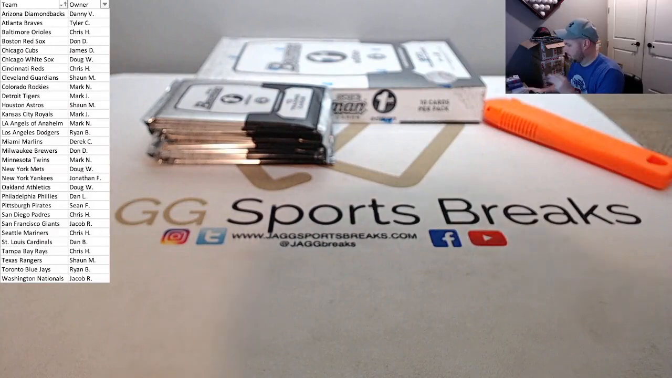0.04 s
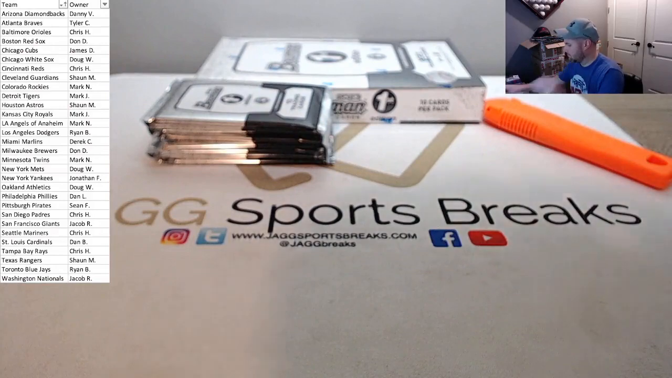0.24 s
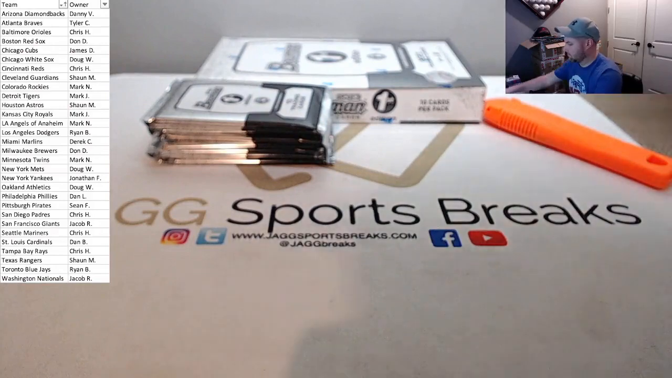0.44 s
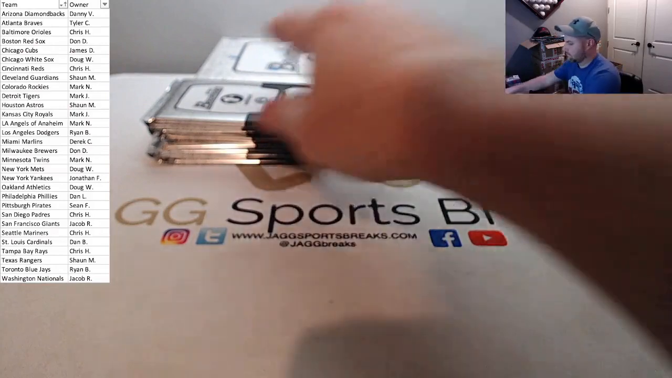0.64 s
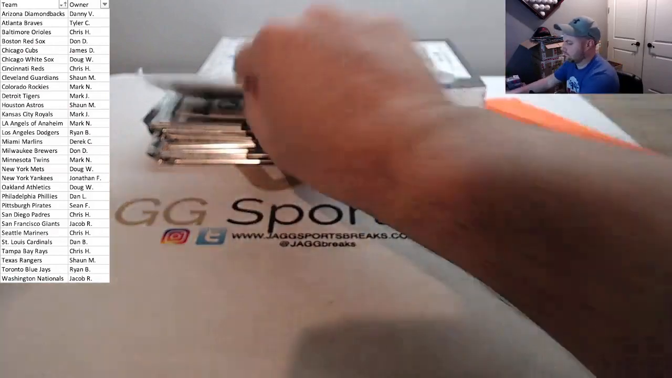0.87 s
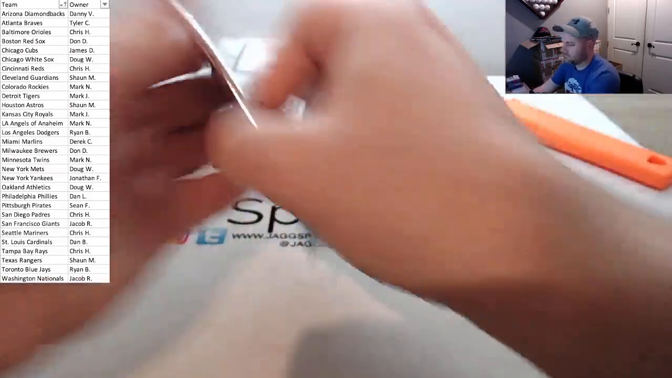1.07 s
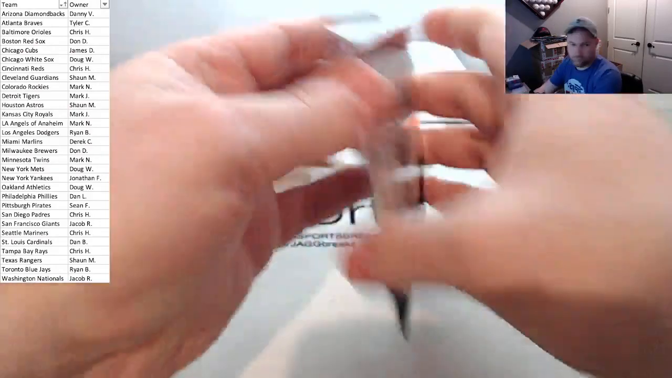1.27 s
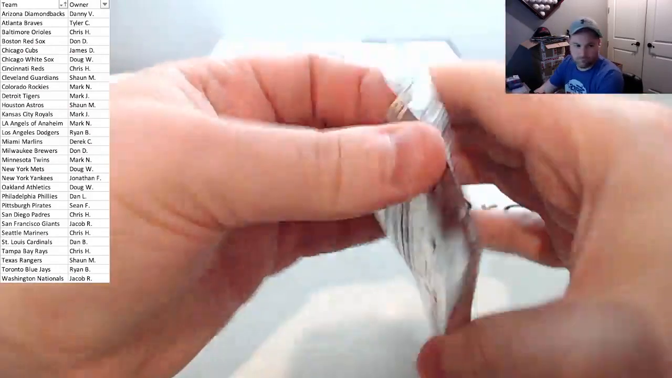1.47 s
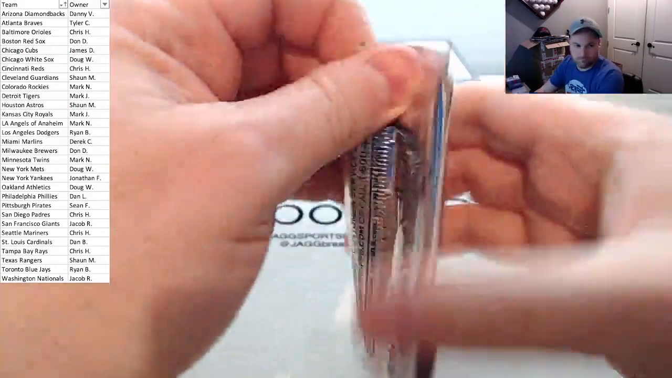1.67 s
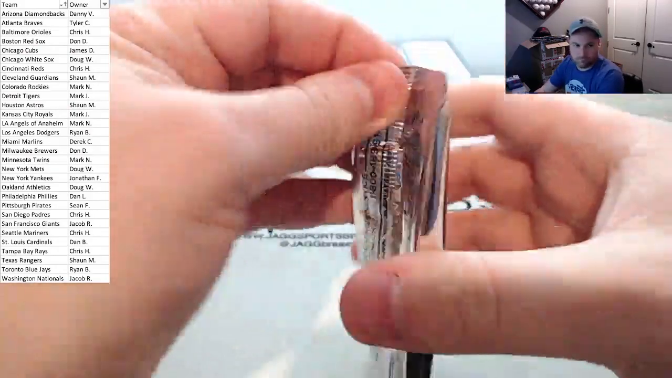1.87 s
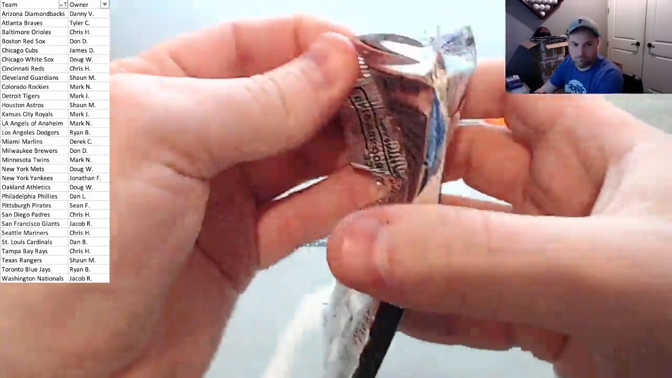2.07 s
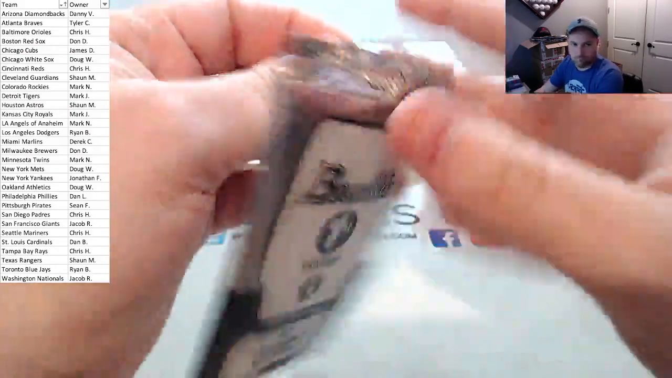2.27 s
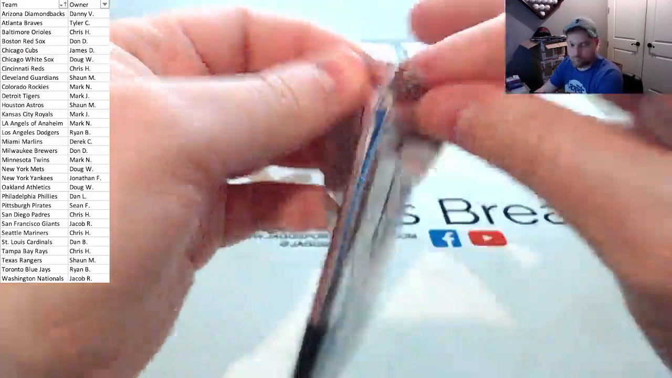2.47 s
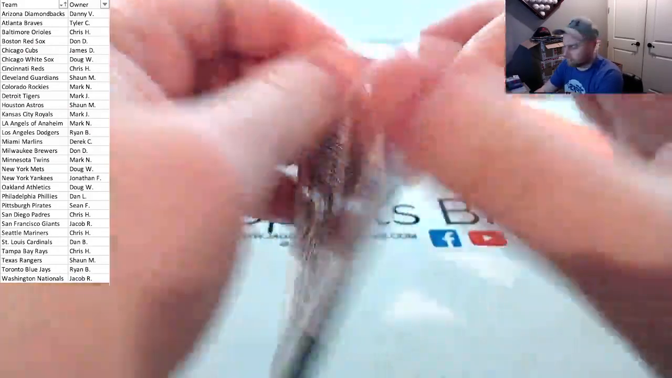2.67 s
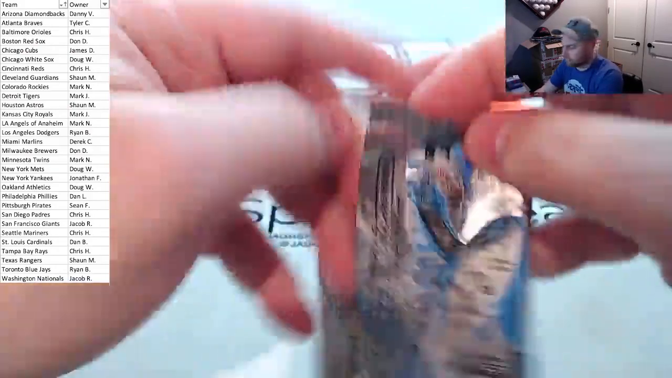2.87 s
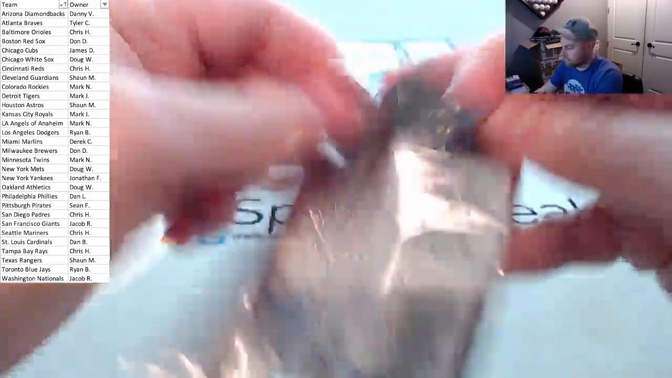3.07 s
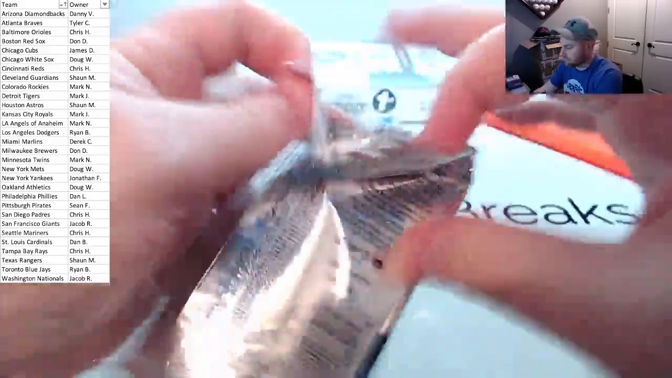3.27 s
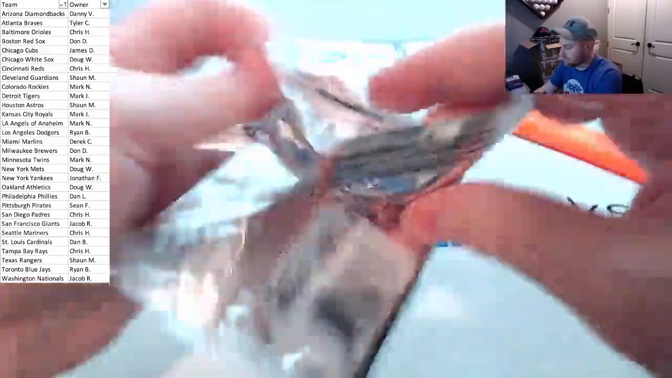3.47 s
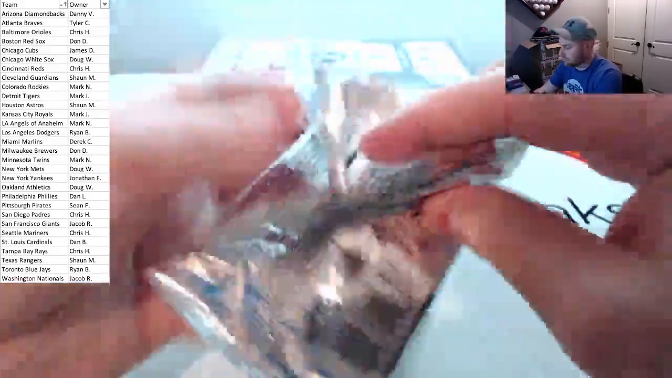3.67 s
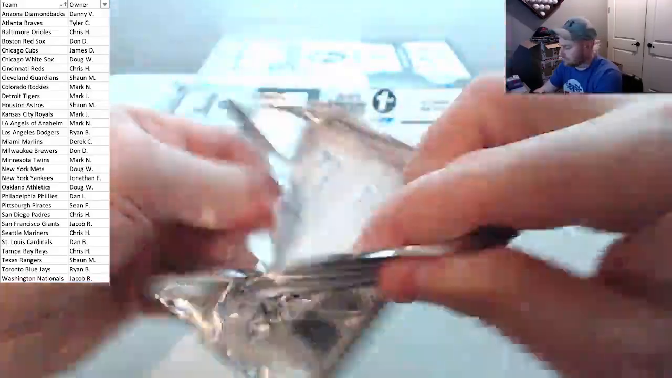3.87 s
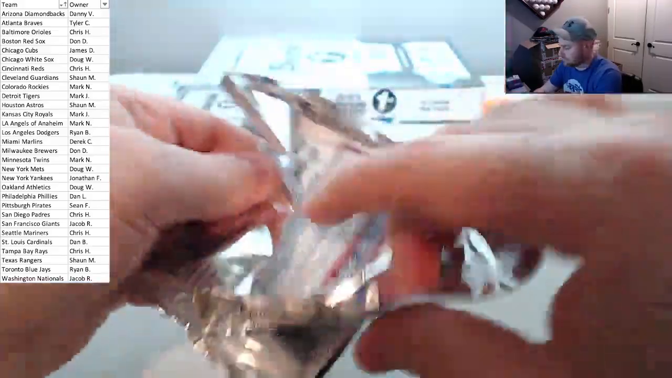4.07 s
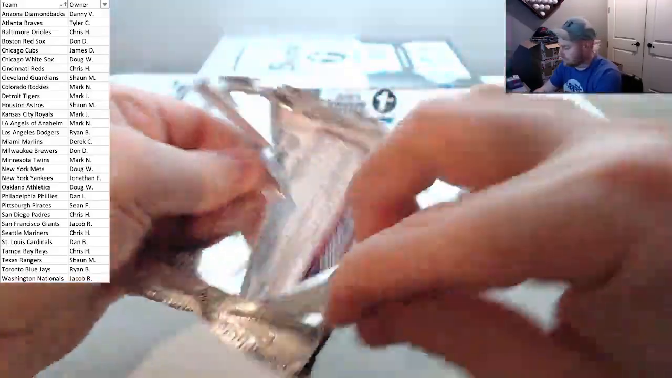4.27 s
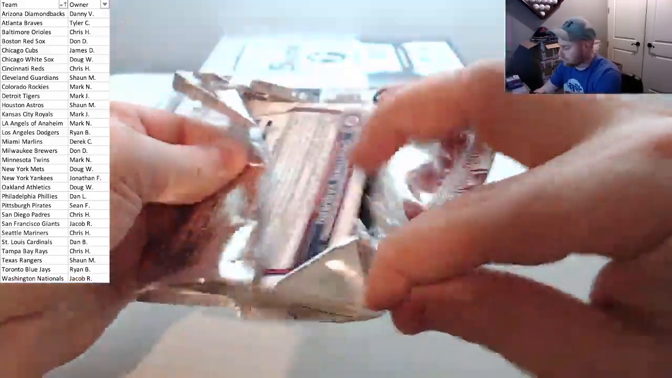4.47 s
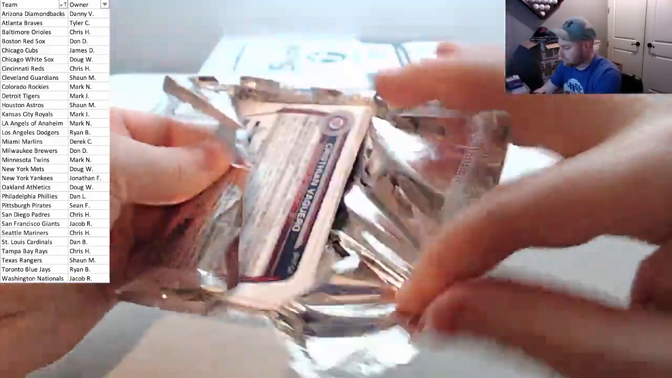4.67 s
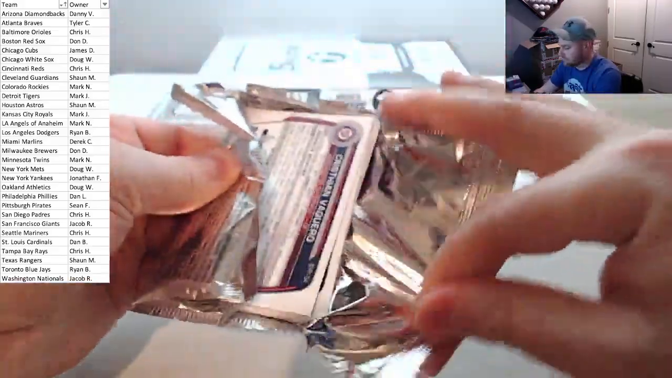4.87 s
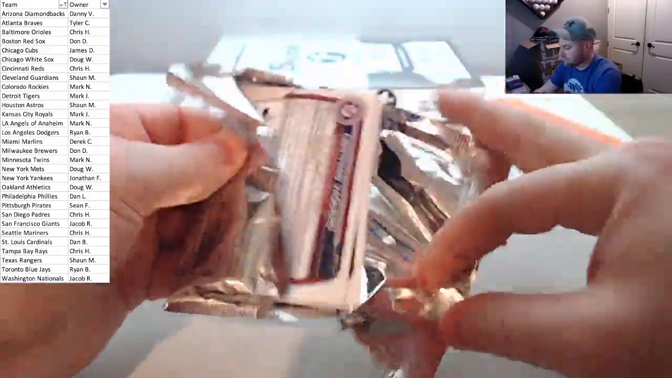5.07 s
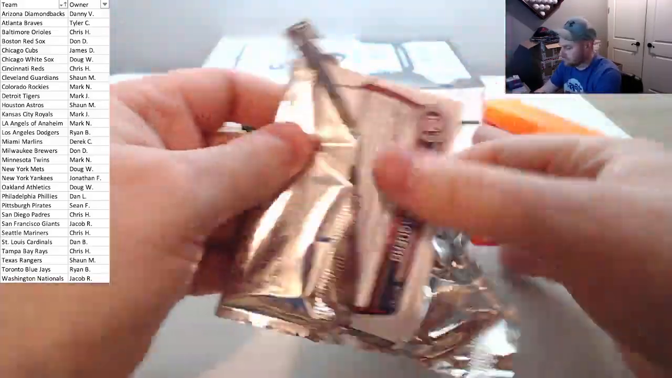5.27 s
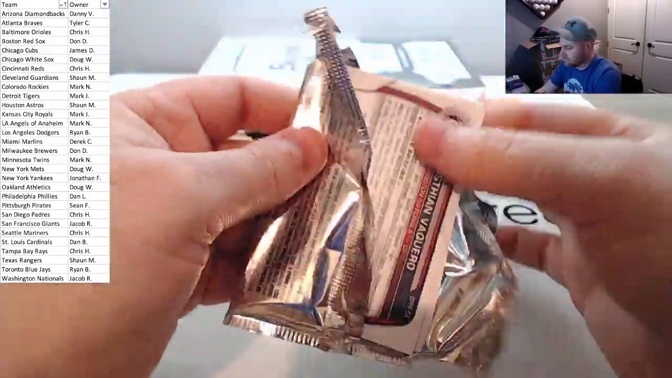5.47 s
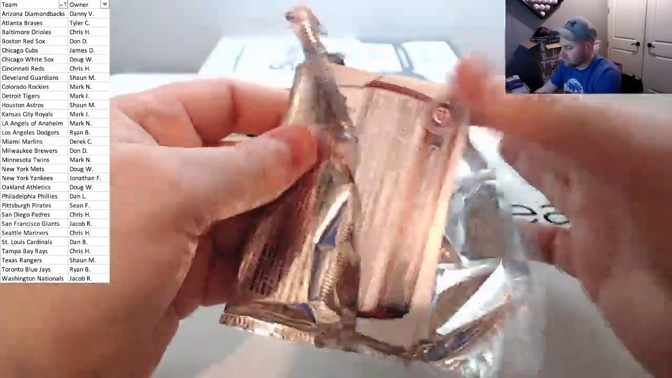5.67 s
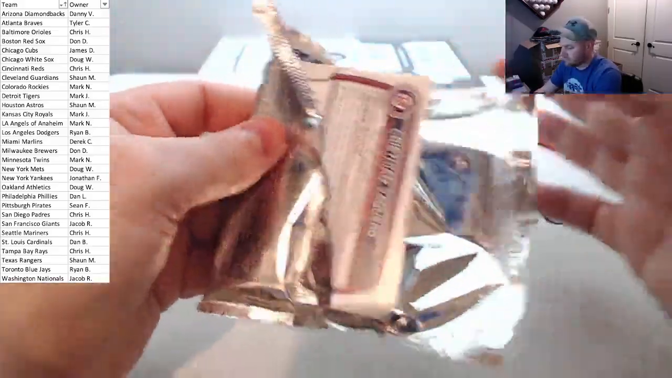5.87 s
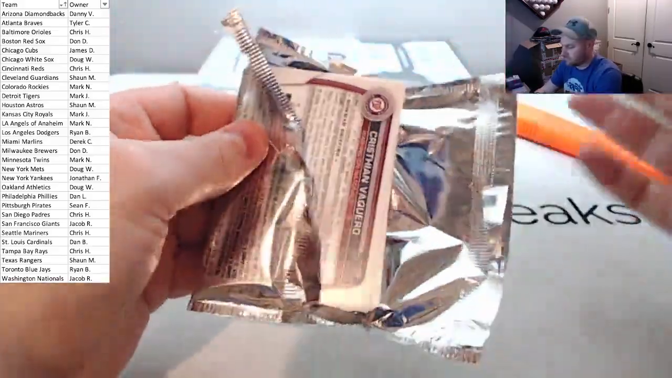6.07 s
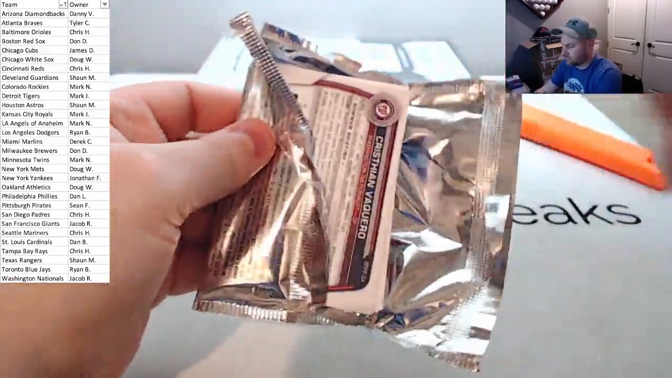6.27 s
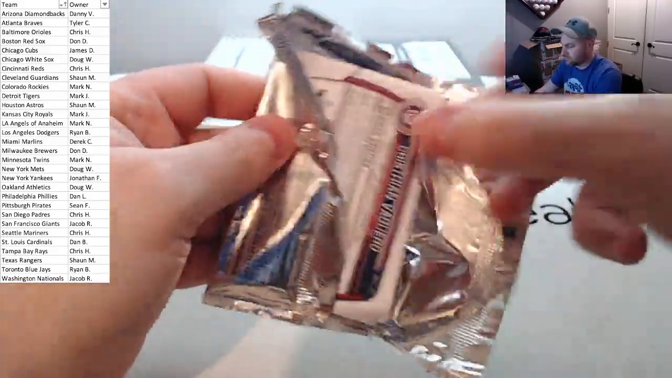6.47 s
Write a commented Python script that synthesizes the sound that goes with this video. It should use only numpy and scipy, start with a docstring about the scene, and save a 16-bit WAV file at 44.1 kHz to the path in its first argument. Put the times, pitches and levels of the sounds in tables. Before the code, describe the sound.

After a soft desk bump, hands pull at a crisp foil wrapper, snapping and crackling loudly in a small lively room before settling.

```python
"""Foil pack torn open over a desk

In a small, lively room a foil pack is picked up, torn open and crinkled by hand before the microphone.
Folds snap as short clicks with scattered noise; showers of random small snaps make the rustle.
The hollow pack and taut foil ring as resonances, and early echoes and a dense tail give the room.
An arm knocks the desk early on; the desk sways and hums faintly as slowly wandering sines under room tone.
"""
import sys
import numpy as np
from scipy import signal
from scipy.io import wavfile
from scipy.ndimage import uniform_filter1d

SR = 44100
rng = np.random.default_rng(int(sys.argv[2]) if len(sys.argv) > 2 else 0)


def int16_out(signal):
    """Quantize to a 16-bit WAV file."""
    q = np.round(np.clip(np.atleast_2d(signal).T, -1, 1) * 32767)
    wavfile.write(sys.argv[1], SR, q.astype(np.int16))


N = 287532
T = np.arange(N) / SR  # time of every sample, s


def gain_of(db):
    """Converts decibels to an amplitude gain."""
    return 10 ** (np.asarray(db) / 20)


def evened(x):
    """Scales a signal to rms 1."""
    return x / np.sqrt(np.mean(x ** 2) + 1e-20)


def over_time(points):
    """Draws straight lines between (time, value) points, one value per sample."""
    return np.interp(T, *np.transpose(points))


def read(points, hz):
    """Reads a spectrum between its points on a log-frequency axis."""
    point_hz, value = np.transpose(points)
    return np.interp(np.log(hz + 1), np.log(point_hz + 1), value)


def add(mix, start_s, sound):
    """Mixes a sound in at start_s, cut off at the end of the mix."""
    part = mix[..., round(start_s * SR):][..., :sound.shape[-1]]
    part += sound[..., :part.shape[-1]]


# Spectrum of the room tone at the microphone, before it is set to its overall level.
# Columns: freq_hz [Hz], level_db [dB per Hz, relative]
ROOM_TONE = [(35, -55), (60, 2.5), (160, -10.5), (189, -6), (222, -8), (579, -17.5), (698, -17),
             (803, -14.5), (1410, -13), (1510, -13.5), (1950, -26), (4220, -32.5), (16000, -34)]


def air(level_db=-69, patch_db=1.8):
    """Steady room tone: noise shaped in frequency, with patches that drift in time and pitch."""
    frames, hz = N // 256 + 5, np.fft.rfftfreq(1024, 1 / SR)
    real, imag, patches = rng.standard_normal((frames, 513, 3)).T
    patches = uniform_filter1d(patches, size=10, axis=0)  # across frequency
    patches = evened(uniform_filter1d(patches, size=16, axis=1))  # across time
    spectrum = (real + 1j * imag) * gain_of(read(ROOM_TONE, hz)[:, None] + patch_db * patches)
    tone = signal.istft(spectrum, nperseg=1024, noverlap=768)[1][:N]
    return gain_of(level_db) * evened(tone)


# Low modes of the desk. Columns: pitch_hz [Hz], wander_hz [Hz rms]
SWAY_MODES = [(11.8, .3), (38, 1.5), (52, 2.), (218, 1.5)]
# Steady level of each low mode, before tremor. Column: level_db [dB]
SWAY_DB = [-53, -65, -72, -88.5]
# The lowest sway grows as the arms lean on the desk.
# Columns: time_s [s], level_db [dB against its steady level]
ARM_LEAN = [(0.45, -22), (0.55, -9), (1.45, -8.5), (1.65, 0)]
# Jolts through the desk and floor; a negative start lies before the first sample.
# Columns: start_s [s], mode [row of SWAY_MODES, from 0], level_db [dB before rise and tremor], t60_s [s]
DESK_JOLTS = [(-0.1, 1, -55, 1.2), (0.4014, 1, -47.5, 1.8), (0.36, 2, -52, 0.76), (0.72, 2, -54.5, .8),
              (2.8, 1, -60, 1.2), (3.35, 1, -66, 1.7), (4.2, 1, -65.5, 1.1), (5.2, 1, -63.5, 1.6),
              (6.081, 1, -60.5, 0.56), (-0.25, 3, -80, 9.0)]


def slow_wander():
    """A random-phase sum of slow sines, 0.3 to 4 Hz, at rms 1."""
    return evened(sum(np.sin(2 * np.pi * (f * T + rng.random())) for f in np.geomspace(.3, 4, 12)))


def shake(jolt_rise_s=0.055, tremor_db=3.):
    """Narrow low resonances, kept going by floor and hand tremor and rung up by jolts."""
    levels = gain_of(SWAY_DB)[:, None] * np.ones(N)
    levels[0] *= gain_of(over_time(ARM_LEAN))
    for start_s, mode, db, t60_s in DESK_JOLTS:
        rise = np.clip((T - start_s) / jolt_rise_s, 0, 1)
        levels[round(mode)] += rise * gain_of(db - 60 * abs(T - start_s) / t60_s)
    out = np.zeros(N)
    for (pitch_hz, wander_hz), level in zip(SWAY_MODES, levels):
        drift, tremor = slow_wander(), slow_wander()
        phase = 2 * np.pi * np.cumsum(pitch_hz + wander_hz * drift) / SR
        out += level * gain_of(tremor_db * tremor) * np.sqrt(2) * np.sin(phase)
    return out


# An arm knocks the desk. Columns: start_s [s], level_db [dB of the blow before the modes],
# t60_s [s, fade of the blow], hardness_db [dB per octave]
ARM_KNOCKS = [(0.287, -62, 0.064, 17), (.352, -51, 0.13, 4), (0.409, -58, 0.091, -5.5)]
# Broad modes of the desk top. Columns: pitch_hz [Hz], width_hz [Hz, each of two passes], level_db [dB]
DESK_TOP = [(107, 35, -0.5), (209, 59, 5.5), (327, 100, -5), (512, 67, -15), (1120, 390, -28.5)]


def knocks():
    """Scuffing blows stir the broad modes of the desk top; a hard blow favours the upper ones."""
    out, t = np.zeros(N), np.arange(SR // 2) / SR
    pivot_hz = DESK_TOP[1][0]  # hardness tilts the levels about the second mode
    for start_s, db, t60_s, hardness_db in ARM_KNOCKS:
        rise = np.minimum(t / 0.0039, 1)
        scuff = gain_of(db - 60 * t / t60_s) * rise * rng.standard_normal(len(t))
        for pitch_hz, width_hz, mode_db in DESK_TOP:
            mode = signal.iirpeak(pitch_hz, pitch_hz / width_hz, SR)
            ring = signal.lfilter(*mode, signal.lfilter(*mode, scuff)) * np.sqrt(SR / width_hz)
            tilt_db = hardness_db * np.log2(pitch_hz / pivot_hz)
            add(out, start_s, gain_of(mode_db + tilt_db) * ring)
    return out


# How strongly the finger press sounds as the pack is handled.
# Columns: time_s [s], press_db [dB against the body]
HAND_GRIP = [(0.3, -9), (1.0, -14), (1.5, -14.5), (3.5, -14.5), (4.6, -16.5), (5.1, -3), (5.7, -12.5)]


def band_gains(time_s, db, body_db, sizzle_db):
    """Gains of finger press, body, mid and sizzle for foil handled at time_s."""
    press_db = np.interp(time_s, *np.transpose(HAND_GRIP))
    return gain_of([db + body_db + press_db, db + body_db, db, db + sizzle_db])


# Squeezes that shower small snaps; levels are before the foil's colour, its rings and the room.
# Columns: peak_s [s], level_db [dB], half_length_s [s], body_db, sizzle_db [dB against level_db]
HAND_SQUEEZES = [(0.0, -77, 0.039, 14.5, -8), (0.821, -67.5, 0.046, -11, 8), (1.09, -68, 0.062, -4, -1),
                 (1.302, -53.5, 0.11, -8, 4), (1.528, -53, 0.1, -3, 2.5), (1.871, -47.5, 0.039, -1.5, -0.5),
                 (1.94, -39, 0.041, -21, -0.5), (2.172, -53.5, 0.041, -0.5, -1.5),
                 (2.478, -54, 0.15, -2.5, -2), (2.733, -48, 0.053, -5, 3), (2.858, -58, 0.041, -4, 2.5),
                 (3.06, -60.5, 0.089, 6, 5.5), (3.288, -57.5, 0.15, -1.5, 1.5),
                 (3.448, -53, 0.053, 7.5, 5.5), (3.62, -54, 0.08, 1.5, 1.5), (3.791, -50, 0.043, -9, -1),
                 (3.837, -38, 0.04, -2, 2), (3.948, -52, 0.047, 0.5, 1), (4.219, -54, 0.087, 2, 2),
                 (4.438, -49.5, 0.068, -3, 5.5), (4.548, -57.5, 0.076, 5.5, -3), (4.692, -64, 0.043, 2, 4),
                 (5.0, -64, 0.064, 1.5, 3), (5.12, -61, 0.06, 6.5, 5.5), (5.189, -59, 0.043, 0, -2.5),
                 (5.558, -59.5, 0.054, 3, 1.5), (6.442, -71.5, 0.046, -1.5, -2)]


def squeezing(fall_db=9., resting_db=-90.5):
    """Level, body and sizzle of the rustle: each squeeze swells and fades like a bell curve."""
    power = gain_of(resting_db) ** 2 * np.ones(N)  # the pack merely held
    colour = np.zeros((2, N))
    for peak_s, db, half_length_s, *colour_db in HAND_SQUEEZES:
        # fall_db is the drop at one half length from the peak
        swell = gain_of(db - fall_db * ((T - peak_s) / half_length_s) ** 2) ** 2
        power = power + swell
        colour = colour + np.outer(colour_db, swell)
    return 10 * np.log10(power), *(colour / power)


def crinkle(per_s=700, crowding=.4, spread_db=3.0, t60_s=0.0046, colour_db=2.5):
    """Random small snaps, a few large; harder handling crowds them; each facet favours its own band."""
    db, *colour = squeezing()
    crowd = gain_of(crowding * (db + 56.5))  # per_s holds at -56.5 dB
    struck = rng.random(N) < per_s * crowd / SR
    size = np.minimum(rng.exponential(1, N), 4)
    sign = rng.choice([-1, 1], N)
    train = gain_of(spread_db * size) * struck * sign / np.sqrt(crowd)
    far = train * gain_of(colour_db * rng.standard_normal((4, N)))
    burst = gain_of(-60 * np.arange(300) / SR / t60_s)
    envelope = signal.oaconvolve(abs(far), burst[None], axes=1)[:, :N]
    near = envelope * rng.standard_normal(N)
    both = np.array([[evened(band) for band in drive] for drive in (near, far)])
    return band_gains(T, db, *colour) * both


# Folds that buckle loudly; levels are before the foil's colour, its rings and the room.
# Columns: start_s [s], level_db [dB], body_db, sizzle_db [dB against level_db]
FOLD_SNAPS = [(0.351, -54.5, 1, 5), (0.7614, -63, 3.5, -8), (0.8311, -49.5, -8.5, 0), (0.986, -51, 1, 0),
              (1.052, -66, 2, 10.5), (1.099, -63, 7, -7), (1.1204, -45, -6.5, -5), (1.1862, -63, 11.5, 12),
              (1.228, -45.5, -6, -1), (1.2388, -42.5, 4, 8), (1.275, -53.5, 7, 14), (1.3368, -37, -19, -1),
              (1.411, -40, -12.5, 1.5), (1.4428, -43, -1.5, 3.5), (1.4608, -39, -4.5, 5),
              (1.5369, -51, -1.5, 14.5), (1.7182, -50, -0.5, 4.5), (1.8092, -63, -2, -12),
              (1.823, -43, -6, 0.5), (1.8287, -35.5, -17, 4.5), (1.8712, -47, -11, 2.5),
              (1.8852, -32.5, -16, 3), (1.911, -27.5, -5.5, 0.5), (1.9288, -34, 5, 2.5),
              (1.953, -36, -22.5, -1), (2.1446, -39.5, 1, -1), (2.1886, -52, 2, 12), (2.2632, -53, -7, -5),
              (2.324, -45.5, -8, -4), (2.3386, -40, -14.5, 5.5), (2.4196, -49, -15, 8.5),
              (2.4447, -40, -2.5, 0), (2.468, -41, 0.5, 4.5), (2.501, -43, 3, 4), (2.5798, -53, -6, 7.5),
              (2.6495, -42, -2, -1.5), (2.6638, -52.5, -5, 3), (2.683, -39.5, -12, 1.5),
              (2.718, -39.5, -10, -2), (2.748, -37.5, -5, -9), (2.844, -43, -8, 2.5),
              (2.904, -40.5, -4.5, 0.5), (2.923, -43.5, -18, -0.5), (2.968, -38, -7, -8.5),
              (2.992, -36.5, -7.5, -1.5), (3.009, -53, -4.5, 13), (3.0405, -35.5, -6, 0.5),
              (3.0626, -37, -2.5, 1), (3.1847, -58, 8.5, 10.5), (3.216, -42, -6, -4.5),
              (3.3171, -53, -0.5, -1.5), (3.3293, -38, -26, 2.5), (3.359, -42.5, -4, 1.5),
              (3.407, -38, 3, -2), (3.4304, -29.5, -28.5, -3.5), (3.4425, -44, 5.5, 14),
              (3.4604, -41, 0.5, 11.5), (3.5728, -50.5, -10, 9.5), (3.5971, -39.5, -9, 4),
              (3.6048, -35, 1.5, 3), (3.7552, -48.5, 3, -8), (3.7615, -33.5, -4, 2),
              (3.8485, -33.5, 6, 1.5), (3.873, -31, 1, 1), (4.0018, -34.5, 0.5, 0.5),
              (4.1227, -41, -10, -4), (4.1418, -43, -7, 0.5), (4.1563, -42.5, 8.5, -3.5),
              (4.172, -33.5, -4, -3.5), (4.183, -43.5, 11.5, 6), (4.2178, -35.5, -10, -1),
              (4.305, -53.5, -4.5, 12.5), (4.3732, -49, 12, 5.5), (4.391, -39.5, -15, -5),
              (4.398, -31.5, -1.5, 5), (4.4717, -47, 1, 8), (4.5059, -37.5, -16, 2.5),
              (4.5446, -44.5, 4, -3), (4.6507, -43, -2.5, 7.5), (4.7881, -40, 0, 4.5),
              (4.9233, -48.5, -1.5, -2.5), (4.938, -44.5, 3.5, 6), (5.0209, -50, 2.5, 3),
              (5.0407, -48, -18, 0), (5.0897, -46, -15, 0.5), (5.1624, -49, 0, -1), (5.1747, -55, -17, 7),
              (5.254, -55, 3, 1), (5.276, -58, -12, 6), (5.2913, -41, 0, 4), (5.3637, -39, -3.5, 2),
              (5.4953, -48.5, 1, -10), (5.5017, -42.5, 2, 3), (5.5879, -50, -9, 5.5), (5.635, -55, 5.5, -1),
              (5.813, -60, -13.5, 0.5), (6.372, -75.5, 1, 5), (6.429, -67, 3, -5), (6.47, -53.5, 0, 1.5)]
# Fingers press the pack with a low thud. Columns: start_s [s], level_db [dB, as for the folds]
FINGER_PRESSES = [(0.3499, -56), (0.9861, -52), (1.2394, -58), (1.4613, -56.5), (1.9302, -55),
                  (2.1444, -63), (2.684, -49.5), (3.0621, -44), (3.5971, -51.5), (4.172, -60),
                  (4.1839, -45.5), (4.398, -52), (4.4717, -48), (4.5064, -45.5), (4.5459, -40.5),
                  (4.789, -67), (5.0211, -52), (5.0898, -45.5), (5.255, -53), (5.2927, -58), (5.4942, -42),
                  (5.634, -52), (5.825, -64.5)]


def snaps(t60_s=.013, scatter_db=-10., creak_s=.0007):
    """Each fold creaks, then lets go at once; hands and cards scatter it briefly towards the microphone."""
    near, far, t = np.zeros((4, N)), np.zeros((4, N)), np.arange(160) / SR
    click = 1. * (np.arange(len(t)) == round(creak_s * SR))
    folds = [(row[0], band_gains(*row)) for row in FOLD_SNAPS]
    press_only = np.array([1, 0, 0, 0])
    thuds = [(start_s, gain_of(db) * press_only) for start_s, db in FINGER_PRESSES]
    for start_s, bands in folds + thuds:
        fade = gain_of(scatter_db - 60 * abs(t - creak_s) / t60_s)
        scatter = rng.standard_normal(len(t)) * fade
        add(near, start_s, bands[:, None] * evened(click + scatter))
        # the room hears mostly the bare click
        add(far, start_s, bands[:, None] * evened(click + 0.24 * scatter))
    return np.array([near, far])


def causal(gain):
    """Impulse response of energy 1 with this gain and no sound before the start (minimum phase)."""
    log_gain = np.log(np.maximum(np.concatenate([gain, gain[-2:0:-1]]), 1e-5))
    taps = np.fft.ifft(np.exp(np.conj(signal.hilbert(log_gain)))).real[:len(gain)]
    return taps / np.linalg.norm(taps)


# Colour of a snap at the microphone. Columns: freq_hz [Hz], level_db [dB per Hz, relative]
FOIL_COLOUR = [(88, -52), (150, -31), (315, -24), (941, -8.5), (1060, -4), (1530, -6), (1980, -7.5),
               (2140, -0.5), (2400, -4), (4080, -1.5), (5250, -2.5), (8070, -1.5), (10400, -9),
               (15100, -11.5), (16000, -20)]


def through_foil(drive, press_hz=600, body_hz=1800, sizzle_hz=5500):
    """Finger press, body, mid and sizzle drives each pass their own part of the foil's colour."""
    hz = np.fft.rfftfreq(4096, 1 / SR)
    press, body, mid = (1 / (1 + (hz / edge) ** 8) for edge in (press_hz, body_hz, sizzle_hz))
    shares = press, body - press, mid - body, 1 - mid
    colour = gain_of(read(FOIL_COLOUR, hz))
    return sum(signal.oaconvolve(band, causal(colour * np.sqrt(share)))[:N]
               for band, share in zip(drive, shares))


def resonate(x, pitch_hz, width_hz):
    """Shifts the curve pitch_hz down to zero, smooths, and shifts back: a resonance of gain 1."""
    turn, r = np.exp(2j * np.pi * np.cumsum(pitch_hz) / SR), np.exp(-np.pi * width_hz / SR)
    return 2 * (turn * signal.lfilter([1 - r], [1, -r], x / turn)).real


# The hollow pack's ring moves as it is folded. Columns: time_s [s], pitch_hz [Hz]
PACK_PITCH = [(1.0, 1340), (1.5, 1270), (1.8, 1480), (2.1, 1450), (2.5, 1320), (2.9, 1200), (3.5, 1300),
              (3.85, 1180), (4.03, 1390), (4.2, 1097), (4.6, 1090), (4.95, 1340), (5.2, 1110), (5.7, 1210)]


def pack_ring(foil, level_db=-8., width_hz=280.0):
    """The air in the hollow pack rings at a moving pitch."""
    return gain_of(level_db) * resonate(foil, over_time(PACK_PITCH), width_hz)


# The taut foil rings while the seal is pulled. Columns: time_s [s], level_db [dB]
TAUT_LEVEL = [(0.7, 2), (1.3, -13), (2.2, -8), (2.75, -5), (3.3, -15.5), (4.3, -10), (5.7, -17.5)]


def taut_ring(foil, pitch_hz=4080, width_hz=280):
    """Stretched foil rings at one fixed pitch, its strength following the pull."""
    return gain_of(over_time(TAUT_LEVEL)) * resonate(foil, pitch_hz + 0 * T, width_hz)


# Echoes off the desk and near walls. Columns: delay_s [s], level_db [dB against the direct sound]
NEAR_ECHOES = [(.0026, -10), (.0062, -10.5), (0.0128, -15.5)]
# How long the room rings. Columns: freq_hz [Hz], t60_s [s]
ROOM_DECAY = [(300, 0.21), (1000, 0.34), (2500, 0.34), (6000, 0.33), (14000, 0.2)]


def room(near, far, wet_db=2.3, build_s=.0065):
    """Early echoes, then a dense tail whose bands die at their own speeds; three tails take turns."""
    out, t = near.copy(), np.arange(SR // 2) / SR
    for delay_s, db in NEAR_ECHOES:
        add(out, delay_s, gain_of(db) * near)
    for k in range(3):
        hz, frame_s, noise = signal.stft(rng.standard_normal(len(t)), SR, nperseg=256)
        decay = gain_of(-60 * frame_s / read(ROOM_DECAY, hz)[:, None])
        tail = signal.istft(noise * decay, SR, nperseg=256)[1][:len(t)]
        tail *= np.clip(t / build_s, 0, 1) ** 2
        # the squares of the three turns always sum to 1
        turn = np.sqrt(2 / 3) * np.cos(2 * np.pi * 1.3 * T + k * np.pi / 3)
        out += gain_of(wet_db) * signal.oaconvolve(far * turn, tail / np.linalg.norm(tail))[:N]
    return out


def scene():
    """Foil and desk in the room: near goes straight to the microphone, far feeds the room's tail."""
    near, far = (through_foil(drive) for drive in snaps() + crinkle())
    near, far = (foil + pack_ring(foil) + taut_ring(foil) for foil in (near, far))
    desk = knocks()
    return (air() + shake() + room(desk, desk, wet_db=0.) + room(near, far))[None]


def record(dry, edge_hz=15900):
    """The recorder's band limit: a steep low-pass at edge_hz."""
    taps = signal.firwin(511, edge_hz, window=("kaiser", 9), fs=SR)
    return signal.oaconvolve(dry, taps[None], "same")


dry = scene()
out = record(dry)
int16_out(out)
```